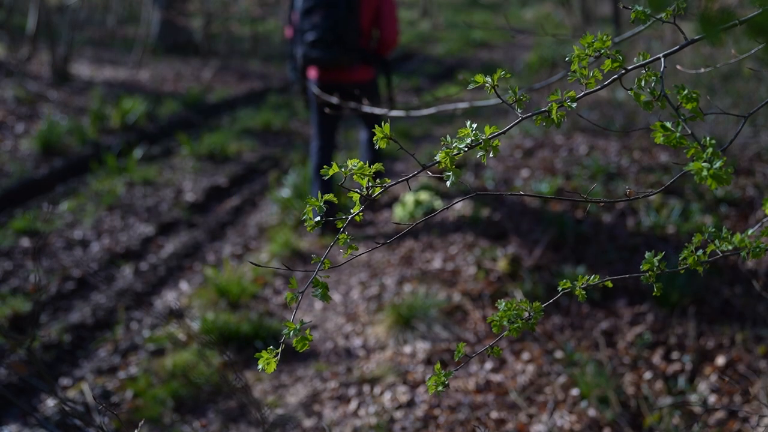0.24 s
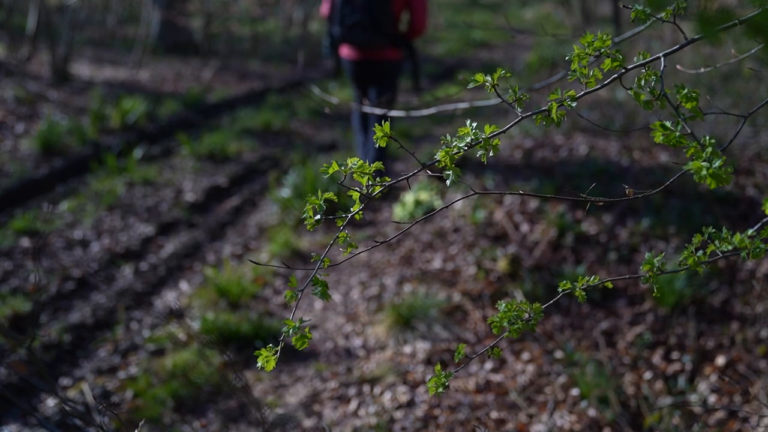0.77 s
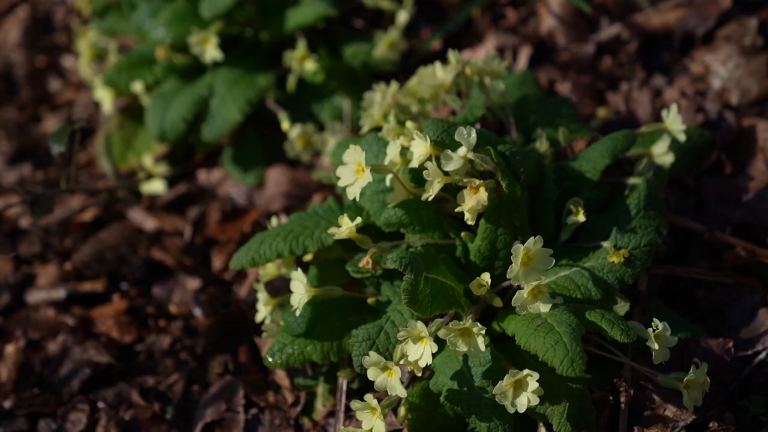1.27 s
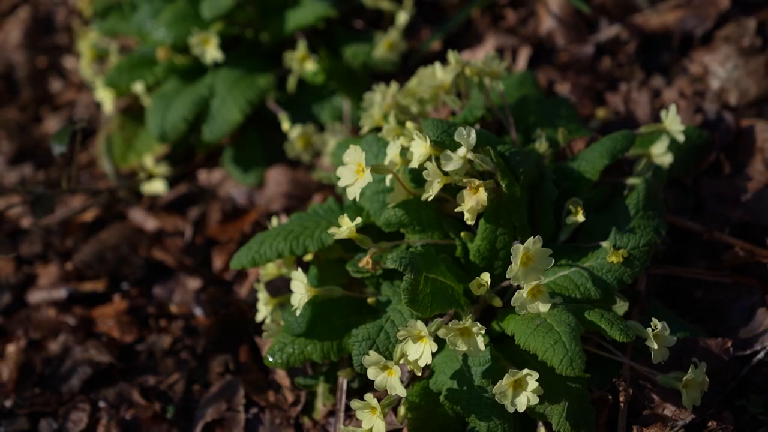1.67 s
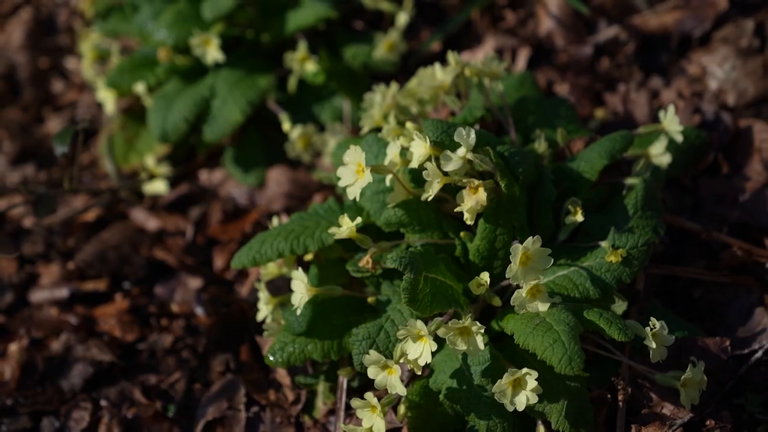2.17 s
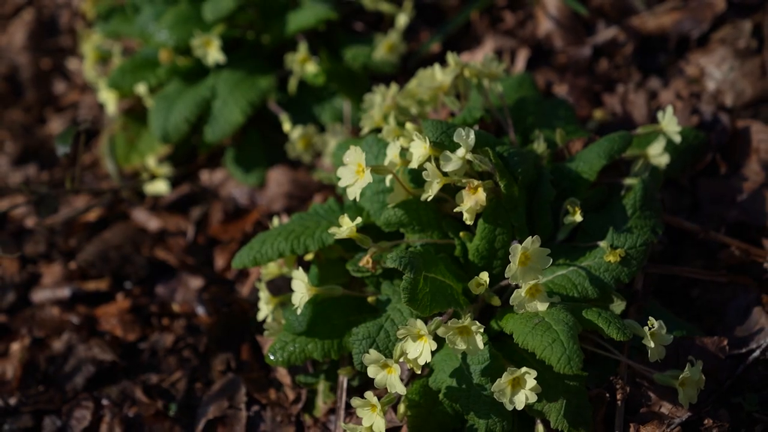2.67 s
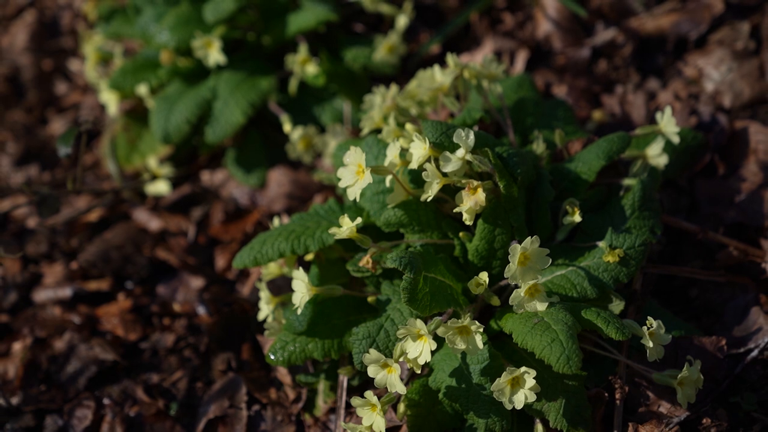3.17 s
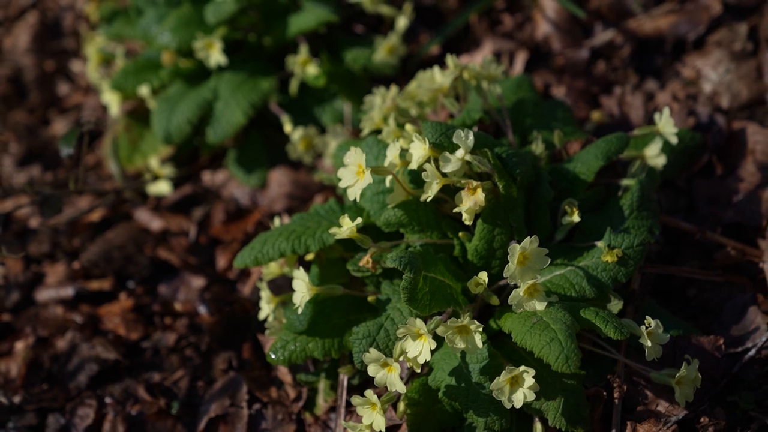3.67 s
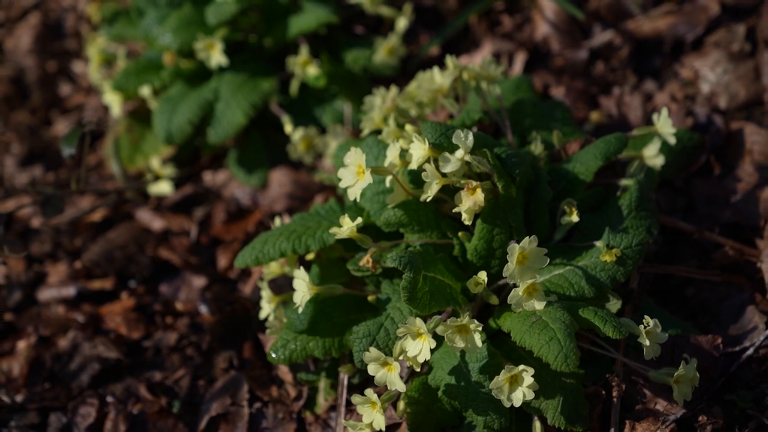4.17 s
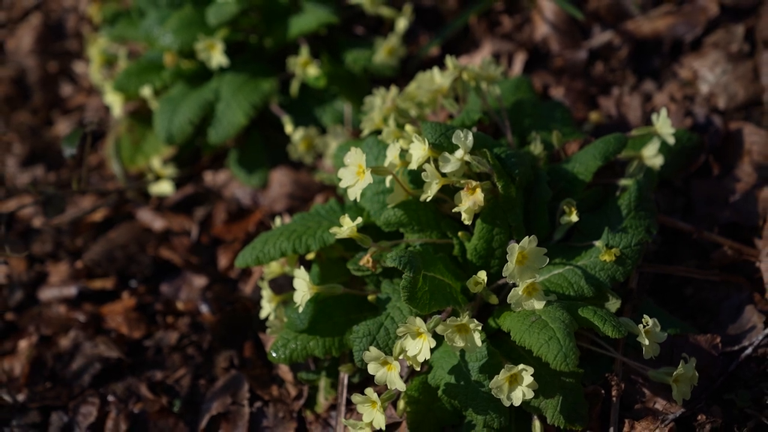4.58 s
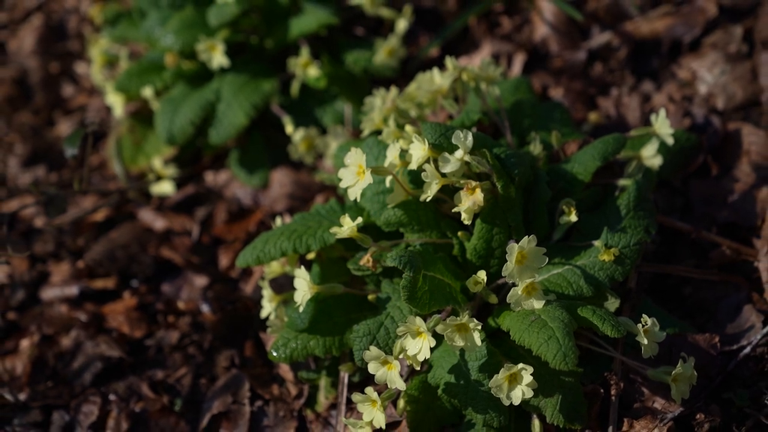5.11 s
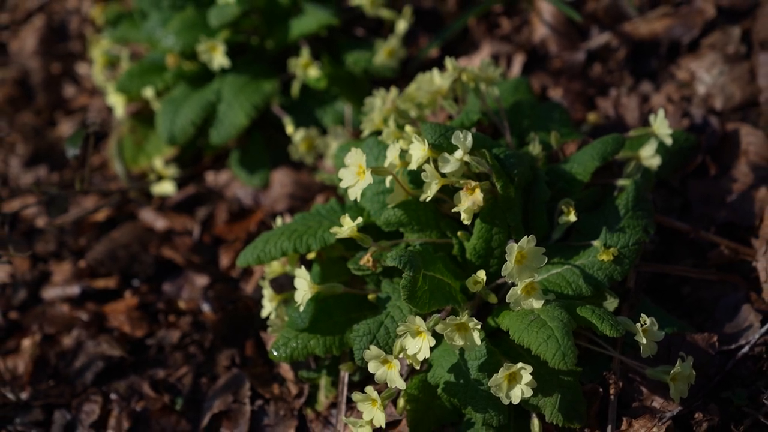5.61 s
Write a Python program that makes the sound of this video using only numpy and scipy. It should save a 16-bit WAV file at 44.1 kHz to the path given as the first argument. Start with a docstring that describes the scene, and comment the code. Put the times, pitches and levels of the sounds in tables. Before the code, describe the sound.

Brief footsteps on a leafy gravel track give way to a songbird's clear whistles, first near and then farther off, in quiet woods.

```python
"""Spring woodland, two scenes, each over a low rumble and soft hiss.
First, boots scuff along a track, crushing leaves and grinding gravel, while a warbler alternates
a high and a low note. At 1.2 s the sound cuts to a quieter, breezy glade, midway through a songbird's
near, arched whistle. Soft taps, faint far birds and three farther whistles follow; then the warbler
starts again. Each bird note is a gliding, nearly pure tone that the trunks scatter into a tail."""
import sys
import numpy as np
from scipy import signal
from scipy.fft import rfft, irfft
from scipy.io import wavfile
from scipy.ndimage import uniform_filter1d

SR = 44100
rng = np.random.default_rng(int(sys.argv[2]) if len(sys.argv) > 2 else 0)


def file_out(sig):
    """Save sig as 16-bit WAV at sys.argv[1]."""
    # one column per channel
    cols = np.atleast_2d(sig).T
    # limit, then scale
    lim = np.clip(cols, -1, 1)
    pcm = np.round(lim * 32767).astype(np.int16)
    wavfile.write(sys.argv[1], SR, pcm)


N = 257984
TIME = np.arange(N) / SR
CUT_S = 1.229  # the track gives way to the glade


def amp(db):
    return 10 ** (np.asarray(db) / 20)


def unit_rms(x):
    return x / np.sqrt(np.mean(x ** 2) + 1e-20)


def colour(x, spectrum):
    """Shapes x with an EQ curve drawn on a log-frequency axis; comes out at rms 1."""
    hz, db = np.transpose(spectrum)
    bins_hz = np.fft.rfftfreq(len(x), 1 / SR)
    gain_db = np.interp(np.log(bins_hz + 1), np.log(hz + 1), db)
    return unit_rms(irfft(rfft(x) * amp(gain_db), len(x)))


def add(mix, start_s, sound):
    """Mixes a sound in at start_s."""
    part = mix[max(round(start_s * SR), 0):][:len(sound)]
    part += sound[:len(part)]


def wander(t, rate_hz):
    """Smooth random drift of rms about 1, moving at up to rate_hz."""
    hz = rate_hz * np.geomspace(1 / 8, 1, num=12)
    return np.sin(2 * np.pi * (hz * t[:, None] + rng.random(len(hz)))).sum(1) / np.sqrt(len(hz) / 2)


def syrinx(notes, waver, flutter_db):
    """A bird's voice: each (times, pitches, levels) note is a wavering sine; moving air flutters it."""
    song = np.zeros(N)
    for times, hz, db in notes:
        t = np.arange(times[0], times[-1], 1 / SR)
        glide = uniform_filter1d(np.interp(t, times, hz), size=len(t) // 14, mode="nearest")
        pitch = glide * (1 + waver * wander(t, 120))
        level = amp(np.interp(t, times, db) + flutter_db * wander(t, 90))
        fades = np.clip(np.minimum(t - t[0], t[-1] - t) / 0.0016, 0, 1)
        add(song, times[0], np.sqrt(2) * level * fades * np.sin(2 * np.pi * np.cumsum(pitch) / SR))
    return song


def trees(x, near_db, far_db, near_t60, far_t60):
    """Echo only: nearby trunks die away quickly, the deep wood rings on (decay times in seconds)."""
    t = TIME[:2 * SR]
    near, far = rng.standard_normal((2, len(t))) * (rng.random((2, len(t))) < 2500 / SR)
    near = near * amp(-60 * t / near_t60) * (1 - np.exp(-t / 0.0015))
    far = far * amp(-60 * t / far_t60) * (1 - np.exp(-t / 0.02))
    echoes = amp(near_db) * near / np.linalg.norm(near) + amp(far_db) * far / np.linalg.norm(far)
    return signal.fftconvolve(x, echoes)[:N]


def knocks(rows, decay_s, width_octaves):
    """Each contact is a brief, dying burst of noise around one frequency."""
    hits, t = np.zeros(N), TIME[:SR // 10]
    edge_ratio = 2 ** (width_octaves / 2)
    for start, db, hz in rows:
        band = np.clip([hz / edge_ratio, hz * edge_ratio], 20, SR / 2 - 100)
        bandpass = signal.butter(1, band, "bandpass", fs=SR)
        ring = unit_rms(signal.lfilter(*bandpass, rng.standard_normal(len(t))))
        add(hits, start, amp(db) * ring * np.exp(-t / decay_s) * (1 - np.exp(-t / 0.00047)))
    return hits


# EQ of the air bed on the track: frequency_hz, gain_db
TRACK_AIR_EQ = [(20, -27), (45, -3.5), (85, -0.5), (180, -12.5), (400, -10), (800, -11.5), (1500, -20),
                (2500, -21), (5000, -19), (9000, -25), (15500, -29)]
# EQ of the air bed in the glade: frequency_hz, gain_db
GLADE_AIR_EQ = [(20, -29), (42, -6), (70, 1), (119, -2.5), (190, -11), (260, -15), (500, -17.5), (900, -18),
                (1250, -26), (1900, -26.5), (3000, -24.5), (5000, -26), (8000, -28), (15700, -30.5)]


def air(spectrum, level_db, swell_db=0.2):
    """A bed of distant rumble and soft hiss; only the low end swells, very slightly."""
    noise = colour(rng.standard_normal(N), spectrum)
    rumble = signal.sosfiltfilt(signal.butter(2, 1200, fs=SR, output="sos"), noise)
    hiss = noise - rumble
    return amp(level_db) * (hiss + rumble * amp(swell_db * wander(TIME, 9)))


# Fader moves of the breeze: time_s, level_db
BREEZE_LEVELS = [(1.2, -70.5), (2.2, -76.5), (2.7, -72.5), (4.45, -71), (5.85, -71)]
# EQ of the treetop hiss: frequency_hz, gain_db
TREETOP_EQ = [(1500, -33), (3200, -11.5), (4800, 0), (6500, -5.5), (9000, -12.5), (15000, -23)]


def breeze():
    """A light wind hisses in the treetops, eases off and builds again."""
    times, level_db = np.transpose(BREEZE_LEVELS)
    return amp(np.interp(TIME, times, level_db)) * colour(rng.standard_normal(N), TREETOP_EQ)


def slides(rows, length_s, fall):
    """Plain notes at an even level, each sliding down by the share `fall` of its pitch."""
    return [([start, start + length_s], [hz, hz * (1 - fall)], [db, db]) for start, hz, db in rows]


# One far bird's low slurs: start_s, start_pitch_hz, source_level_db
LOW_SLURS = [(1.868, 2345, -73.5), (2.075, 2010, -75), (4.841, 2470, -73.5), (5.161, 2016, -76.5)]
# Another's thin pips: start_s, start_pitch_hz, source_level_db
HIGH_PIPS = [(3.47, 7780, -70), (3.682, 7460, -69), (4.558, 6840, -72)]


def far_birds():
    """Quavering calls from deep in the wood, mostly echo; the air soaks up the high ones sooner."""
    slurs = syrinx(slides(LOW_SLURS, length_s=0.17, fall=0.11), waver=0.04, flutter_db=2.5)
    pips = syrinx(slides(HIGH_PIPS, length_s=0.065, fall=0.06), waver=0.008, flutter_db=2.5)
    slur_echo = trees(slurs, near_db=-1, far_db=-0.5, near_t60=0.81, far_t60=3.2)
    pip_echo = trees(pips, near_db=-9, far_db=-4, near_t60=0.38, far_t60=0.94)
    return slur_echo + pips * amp(-8) + pip_echo


# Soft, close taps: start_s, pre_trim_level_db, centre_hz
SOFT_TAPS = [(1.76, -47, 700), (2.248, -49, 504), (5.025, -55.5, 895)]


def taps(trim_db=-5, decay_s=0.0071):
    """Each tap is a dull tick over a low thud an octave down."""
    ticks = knocks(SOFT_TAPS, decay_s, width_octaves=1.4)
    thuds = knocks([(start, db, hz / 2) for start, db, hz in SOFT_TAPS], decay_s, width_octaves=0.32)
    return amp(trim_db) * (ticks + thuds)


def crackle(per_s, spread_db):
    """A dense train of tiny fractures, a few of them large."""
    size = amp(spread_db * np.minimum(rng.exponential(1, N), 4))
    return rng.choice([-1, 1], N) * size * (rng.random(N) < per_s / SR)


# Scuffs of boots and clothes: start_s, length_s, leaf_level_db, gravel_level_db
BOOT_SCUFFS = [(-.08, 0.16, -69, -62.5), (0.32, 0.16, -58, -63.5), (0.386, 0.23, -63, -61.5),
               (0.534, 0.13, -55.5, -63), (0.577, 0.28, -52, -59), (.87, 0.31, -60, -66.5)]
# Leaves and twigs snapping: peak_s, level_db, half_length_s
TWIG_SNAPS = [(0.604, -56, 0.003), (0.661, -47, 0.0086), (.755, -49, 0.0049), (0.806, -51.5, 0.0088),
              (.857, -54, .0012)]
# Stones knocking underfoot: start_s, level_db, ring_hz
STONE_KNOCKS = [(.04, -53, 600), (.108, -53.5, 1160), (.263, -53, 453), (.387, -50, 1750),
                (.44, -49.5, 344), (.958, -51.5, 564)]
# EQ of the crisp leaves: frequency_hz, gain_db
LEAF_EQ = [(800, -12), (2000, -9), (4000, 3.5), (7000, 0), (10500, -3), (13000, -11), (15500, -17)]
# EQ of the dull gravel: frequency_hz, gain_db
GRAVEL_EQ = [(60, 4), (150, 5), (450, -1), (800, 5.5), (1500, 2.5), (3000, -10), (8000, -19), (15000, -50)]


def walker(clump_db=2.5):
    """Boots crush dry leaves, grind the gravel below them and knock stones together."""
    leaf_power, gravel_power = np.zeros((2, N))
    for start, length, leaf_db, gravel_db in BOOT_SCUFFS:
        pressure = np.sin(np.pi * np.clip((TIME - start) / length, 0, 1)) ** 2.7  # gathers mid-scuff
        leaf_power += pressure * amp(leaf_db) ** 2
        gravel_power += pressure * amp(gravel_db) ** 2
    for peak_s, db, half_length in TWIG_SNAPS:  # a snap is a brief surge of the leaf crackle
        leaf_power += amp(db) ** 2 * np.exp(-((TIME - peak_s) / half_length) ** 2)
    leaves = np.sqrt(leaf_power) * colour(crackle(per_s=7000, spread_db=2.5), LEAF_EQ)
    leaves *= amp(clump_db * wander(TIME, 90))
    gravel = np.sqrt(gravel_power) * colour(crackle(per_s=2300, spread_db=5.5), GRAVEL_EQ)
    return leaves + gravel + knocks(STONE_KNOCKS, decay_s=0.0085, width_octaves=0.32)


def warble(start, held_hz, fall_s, hold_until_s, length_s, db, swell_db):
    """A warbler's note falls fast, with an accent, onto a held pitch, then drops again and fades."""
    from_hz, towards_hz = 6680, 3420
    t = np.arange(0, length_s, 1 / SR)
    fall = np.exp(-(t / fall_s) ** 1.294)
    drop = 1 - np.exp(-np.maximum(t - hold_until_s, 0) / 0.016)
    hz = held_hz + (from_hz - held_hz) * fall + (towards_hz - held_hz) * drop
    accent_db = 3.5 * np.sin(np.pi * fall)
    release_db = -8 * np.exp((t - length_s) / 0.018)
    return start + t, hz, db + accent_db + swell_db * (t / length_s - 0.5) + release_db


# The warbler's notes, high and low in turn:
# start_s, held_pitch_hz, fall_s, hold_until_s, length_s, source_level_db, swell_db
WARBLER_NOTES = [(0.014, 5120, .008, 0.037, 0.1, -53, -1.5), (0.353, 3970, .011, .105, 0.11, -55, -2),
                 (.672, 5110, .007, .058, 0.098, -52.5, 2), (0.996, 3966, 0.014, .1, 0.12, -54.5, 6),
                 (5.172, 5130, .007, .036, .066, -53, 2), (5.525, 4180, 0.00397, .072, 0.088, -52.5, -3.5)]


def warbler(from_s, until_s, direct_db, waver):
    """High in the canopy: branches shade the direct sound and held pitches linger among the trees."""
    notes = [warble(*row) for row in WARBLER_NOTES if from_s <= row[0] < until_s]
    song = syrinx(notes, waver, flutter_db=1.5)
    return song * amp(direct_db) + trees(song, near_db=-5.5, far_db=-2.6, near_t60=0.43, far_t60=1.05)


def arch(start, top_hz, db, length_s=0.258, attack_s=0.04, release_s=0.054):
    """A whistle climbs to a rounded crest and sinks more gently, swelling in and fading out."""
    crest = 0.45  # share of the length spent rising
    rise_from, fall_to = 0.6, 0.72  # shares of the top pitch
    t = np.arange(0, length_s, 1 / SR)
    past_crest = t / length_s - crest
    rising = past_crest < 0
    from_crest = abs(past_crest) / np.where(rising, crest, 1 - crest)
    sag = np.where(rising, 1 - rise_from, 1 - fall_to) * from_crest ** 1.85  # nearly a parabola
    attack = np.maximum(1 - t / attack_s, 0)
    release = np.maximum(1 - (length_s - t) / release_s, 0) ** 2
    return start + t, top_hz * (1 - sag), db - 21 * (attack + release)


# Contour of the near whistle, a flat-topped arch: time_s, pitch_hz, level_db
NEAR_CONTOUR = [(1.16, 2378, -43), (1.195, 2938, -32), (1.232, 3330, -34.5), (1.268, 3560, -36.5),
                (1.284, 3506, -36), (1.342, 3530, -33.5), (1.372, 3466, -38.5), (1.392, 3309, -33.5),
                (1.408, 3323, -33), (1.425, 3120, -43)]
# The three farther whistles: start_s, top_pitch_hz, level_db
FARTHER_WHISTLES = [(3.25, 3694, -57), (3.712, 3788, -56.5), (4.312, 3796, -55.5)]


def whistler():
    """A songbird's arched whistles: the near one is fairly dry, the farther ones are wetter."""
    near = syrinx([np.transpose(NEAR_CONTOUR)], waver=0.0032, flutter_db=1.3)
    farther = syrinx([arch(*row) for row in FARTHER_WHISTLES], waver=0.0077, flutter_db=2.5)
    near_echo = trees(near, near_db=-11.5, far_db=-12, near_t60=0.96, far_t60=1.95)
    farther_echo = trees(farther, near_db=-8.5, far_db=-4, near_t60=0.3, far_t60=1.47)
    return near + near_echo + farther + farther_echo


def scene():
    """The track, then a hard cut to the glade, in mono."""
    track = air(TRACK_AIR_EQ, level_db=-57) + walker()
    track += warbler(0, CUT_S, direct_db=-7, waver=0.0078)
    glade = air(GLADE_AIR_EQ, level_db=-57.5) + breeze() + taps() + whistler() + far_birds()
    glade += warbler(CUT_S, N / SR, direct_db=-5, waver=0.0098)
    return np.where(TIME < CUT_S, track, glade)[None]


def record(dry, cutoff_hz=15800):
    """A steep low-pass takes off the very top of the mix."""
    lowpass = signal.firwin(511, cutoff_hz, window=("kaiser", 9), fs=SR)
    return signal.oaconvolve(dry, lowpass[None], "same")


dry = scene()
out = record(dry)
file_out(out)
```